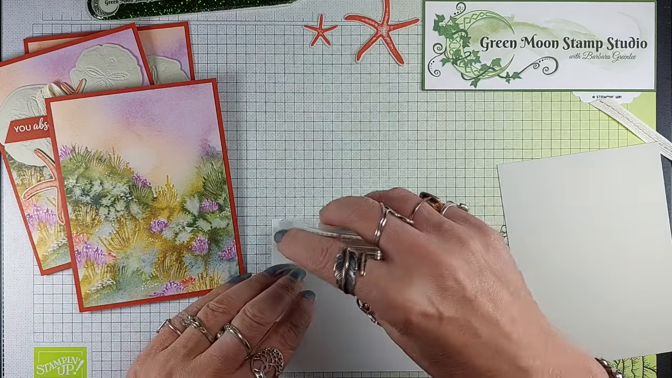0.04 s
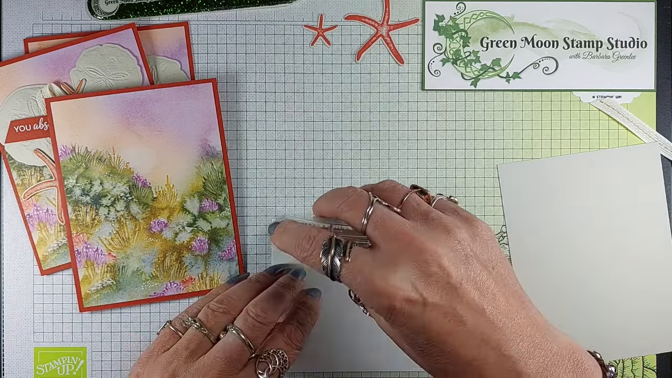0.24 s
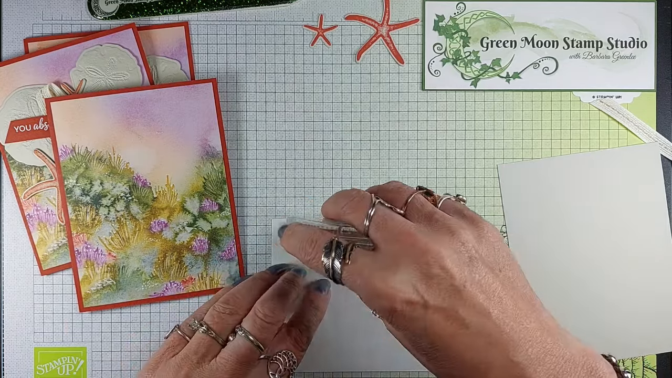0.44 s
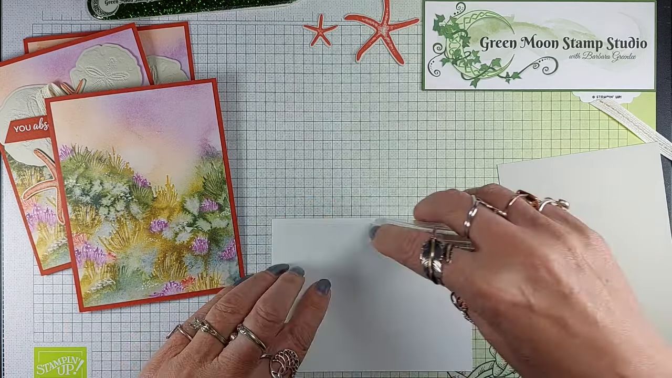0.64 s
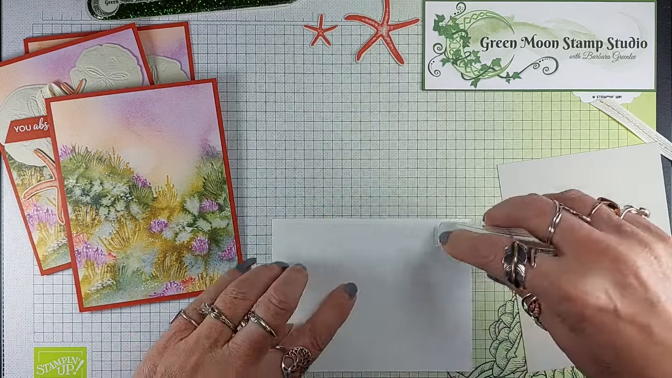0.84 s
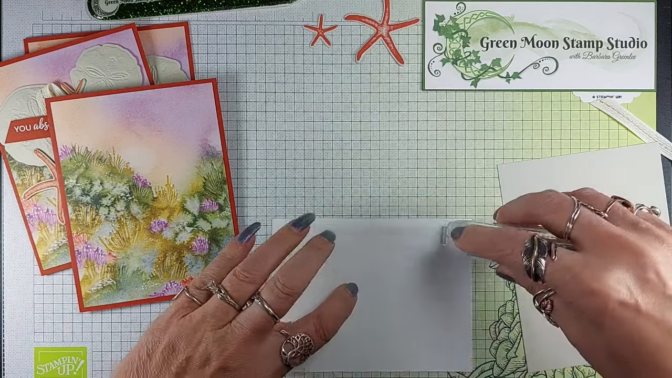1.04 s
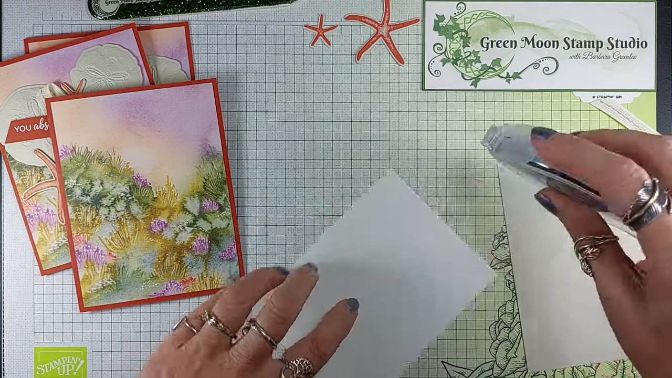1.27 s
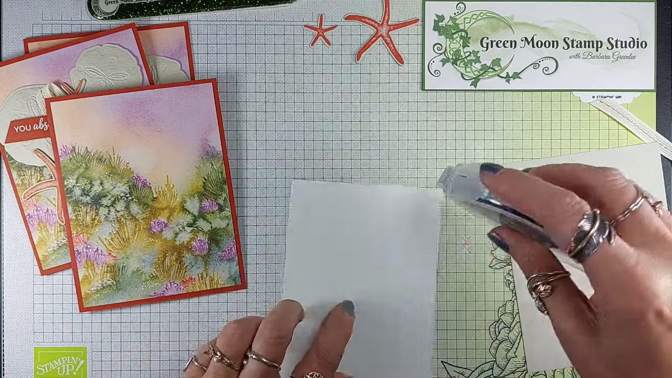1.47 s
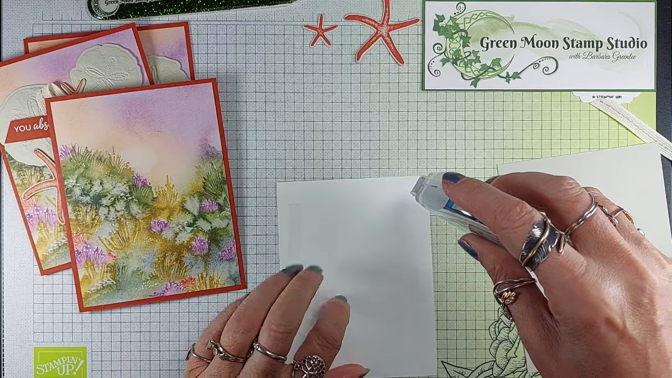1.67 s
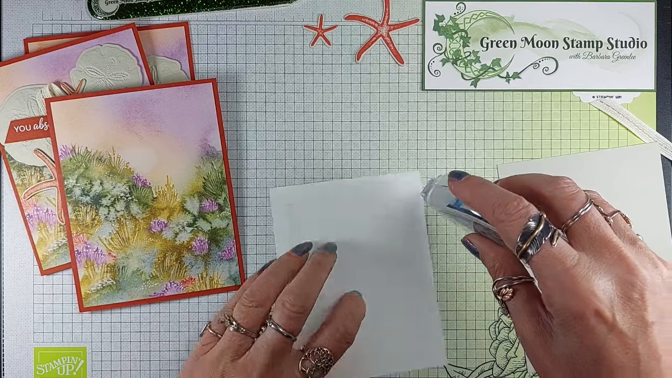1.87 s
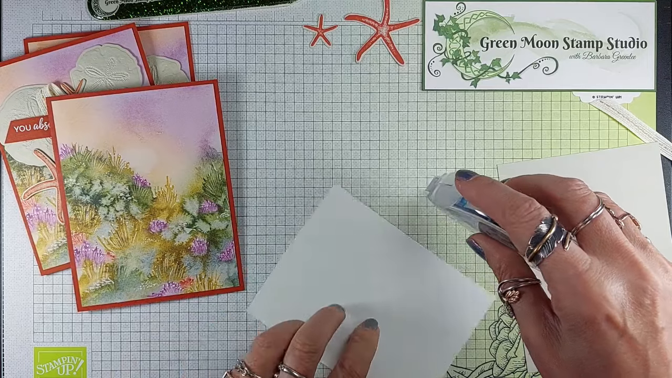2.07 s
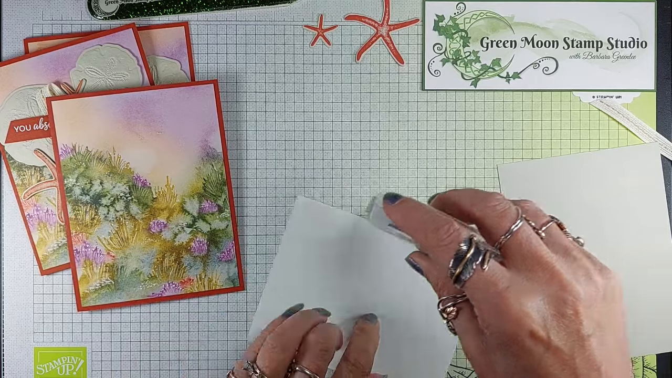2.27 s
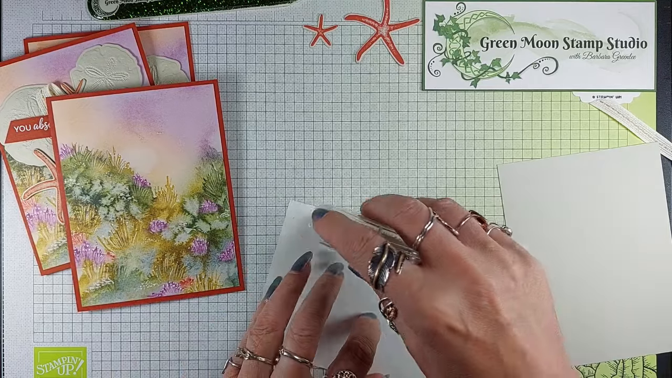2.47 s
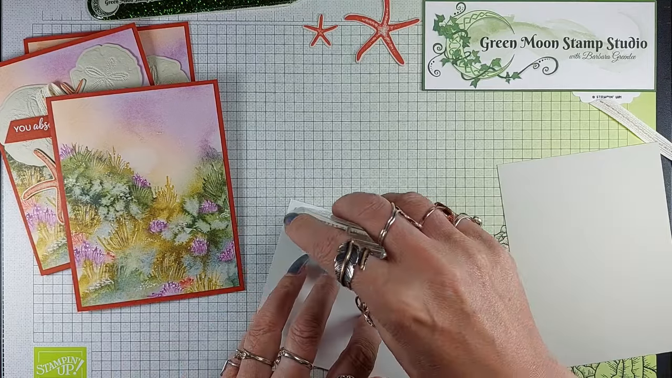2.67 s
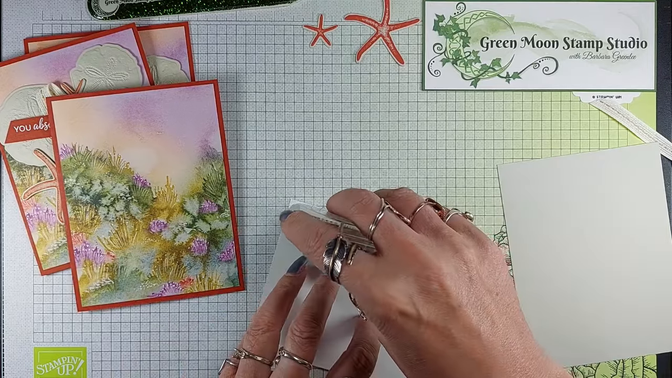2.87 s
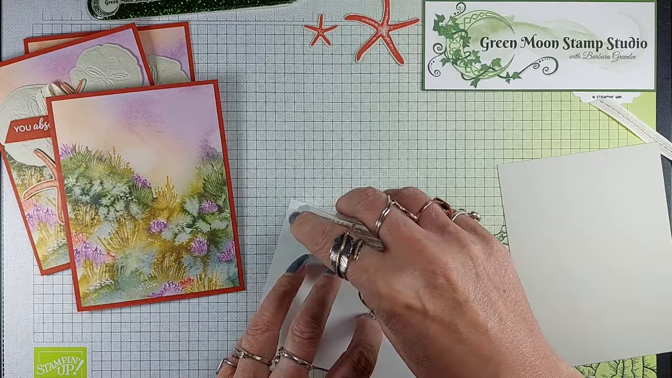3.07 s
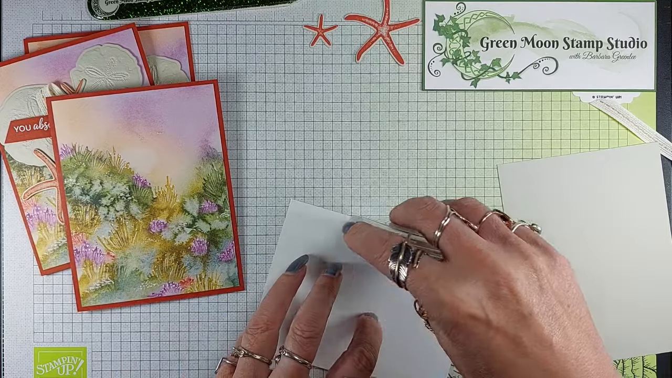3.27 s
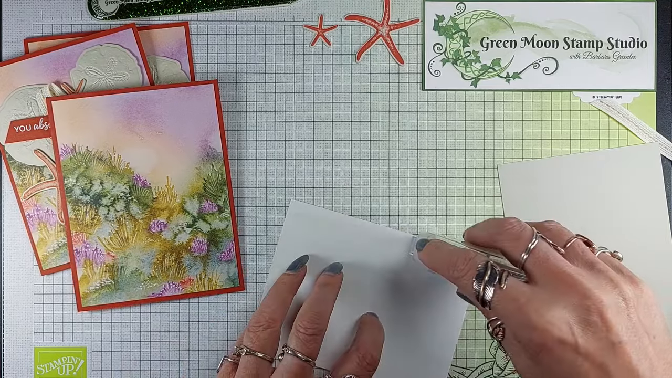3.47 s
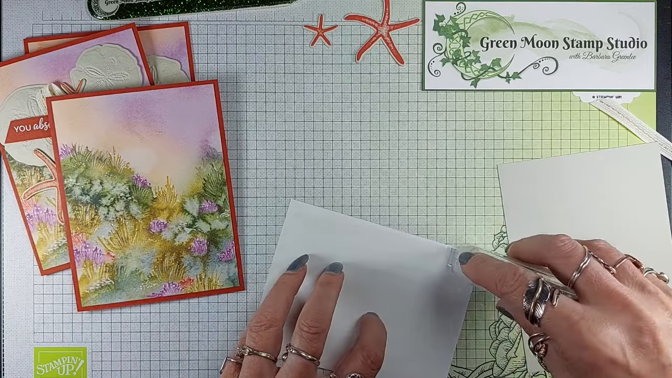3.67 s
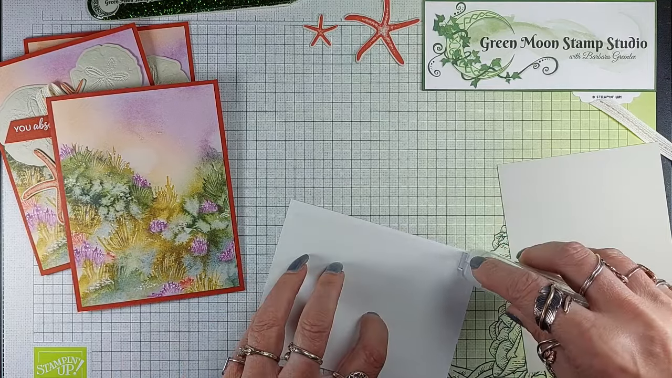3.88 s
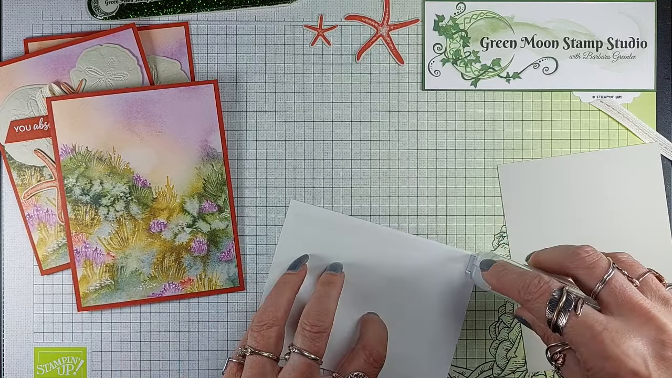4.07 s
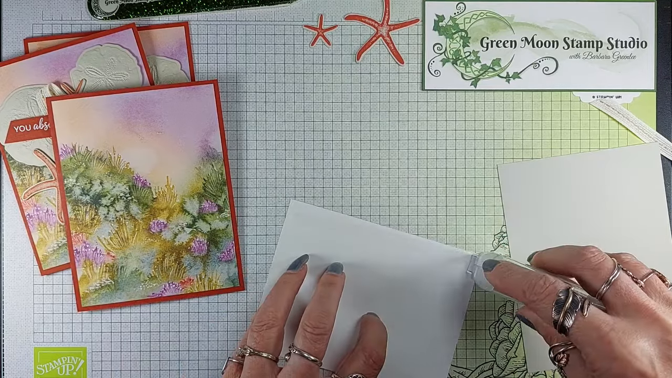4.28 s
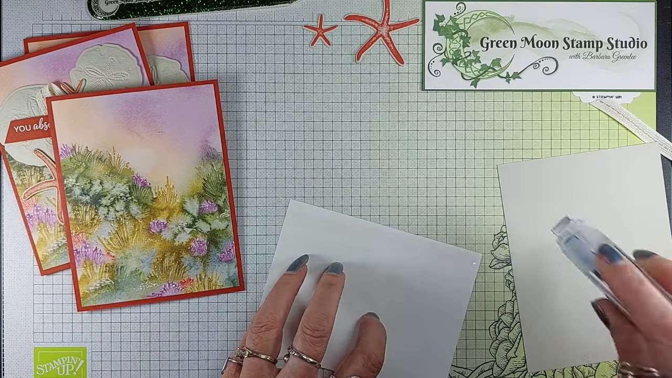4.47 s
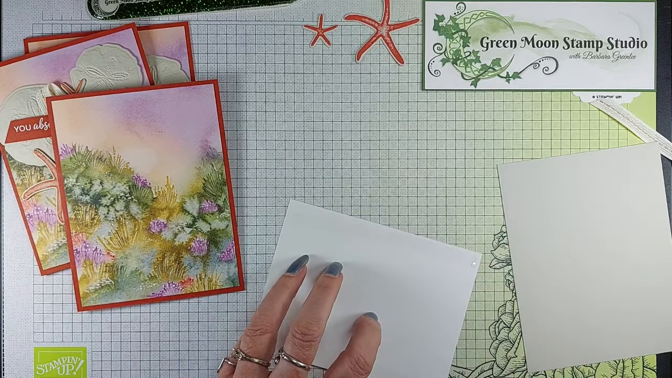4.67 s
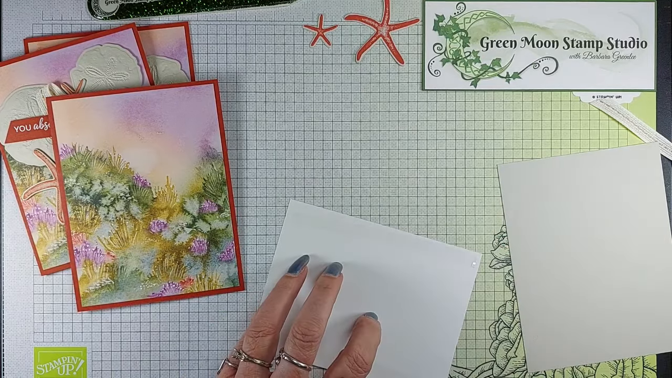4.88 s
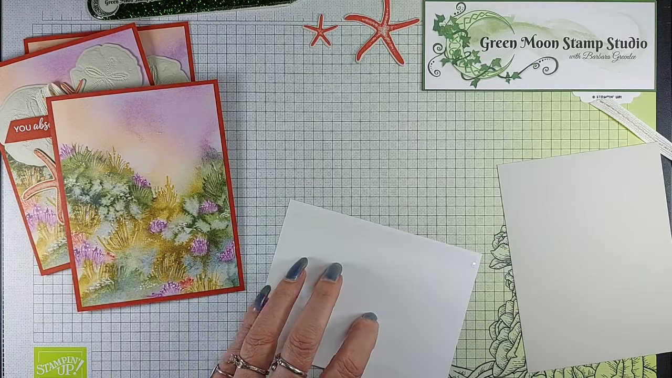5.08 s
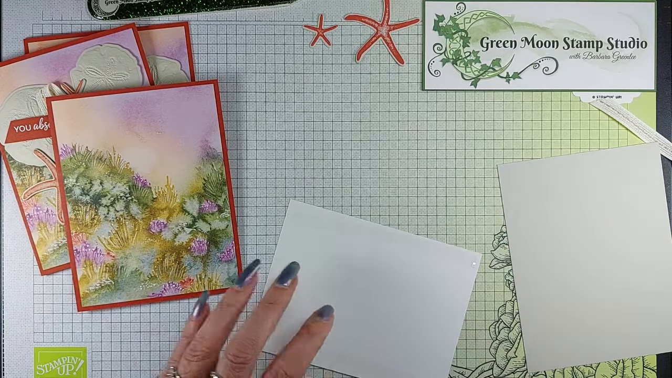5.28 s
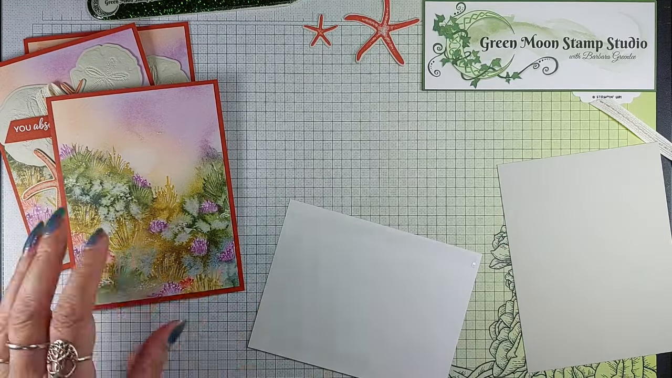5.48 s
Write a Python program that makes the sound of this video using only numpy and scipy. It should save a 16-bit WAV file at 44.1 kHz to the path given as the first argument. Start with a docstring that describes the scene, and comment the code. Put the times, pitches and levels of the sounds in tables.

```python
"""A craft table close under the microphone, in a quiet room with a low hum and a steady hiss throughout.
After a light tap a plastic tape runner creaks as it is pressed down, then is pulled across cardstock:
its ratchet buzzes, the tape hisses and the shell judders, all noise and clicks through filters and modes.
The card is slid and turned with hisses, rasps and taps, and a second creak and a second pull follow.
After more taps and a last slide the runner is put down, bounces, and soft pushes thump the table."""
import sys
import numpy as np
from scipy import signal
from scipy.io import wavfile
from scipy.ndimage import uniform_filter1d

SR = 44100
rng = np.random.default_rng(int(sys.argv[2]) if len(sys.argv) > 2 else 0)


def master_out(mix):
    """Clip the mix to full scale and print it as 16-bit PCM to the path in sys.argv[1]."""
    frames = np.transpose(np.atleast_2d(mix))
    ceiling = np.clip(frames, -1, 1)
    pcm = np.round(ceiling * 32767).astype(np.int16)
    wavfile.write(sys.argv[1], SR, pcm)


N = 243740
T = np.arange(N) / SR

# Modes of the runner's plastic shell: [centre_hz, width_hz, relative_db]
SHELL = [(500, 120, -2.5), (634, 70, 3), (783, 155, 13), (1032, 264, 14), (1263, 120, 11), (1544, 200, 2),
         (2100, 300, 2)]
# Modes of the mat and card under the hands: [centre_hz, width_hz, relative_db]
CARD = [(317.5, 46.7, -4.5), (462, 660, -12), (602.3, 45.6, 5), (860, 46, -2)]
# Spectrum of tape peeling off: [frequency_hz, relative_db]
PEEL = [(880, -24.5), (1500, -6.5), (2510, -7), (2810, 5.5), (3430, -10), (3840, 2), (4950, -6),
        (5800, -25), (7540, -39.5), (12800, -120)]
# Spectrum of a knock, the low part of a click, and of a scrape: [frequency_hz, relative_db]
KNOCK = [(600, -25.5), (1100, 5.5), (1800, 3.5), (2100, 4.5), (2450, 3), (3500, -36.5)]
# Spectrum of a blunt contact: [frequency_hz, relative_db]
SOFT = [(1000, 0), (4000, -40)]


def gain_of(db):
    """Decibels to gain."""
    return 10 ** (np.asarray(db) / 20)


def read(points, hz):
    """A spectrum table read on a log-frequency axis."""
    f, value = np.transpose(points)
    return np.interp(np.log(hz + 1), np.log(f + 1), value)


def colour(x, points):
    """Causal minimum-phase filter of a spectrum table, keeping the power of white noise."""
    hz = abs(np.fft.fftfreq(8192, 1 / SR))
    log_gain = np.log(gain_of(np.maximum(read(points, hz), -100)))
    spectrum = np.exp(np.conj(signal.hilbert(log_gain)))
    response = np.fft.ifft(spectrum).real[:4096]
    return signal.oaconvolve(x, response / np.linalg.norm(response))[:len(x)]


def ring(x, modes):
    """A small body of damped modes, which radiates no bass; the power of white noise is kept."""
    t = T[:2048]
    response = np.zeros(len(t))
    for hz, width, db in modes:
        decay = np.exp(-np.pi * width * t)
        response += gain_of(db) * np.sqrt(width) * decay * np.sin(2 * np.pi * hz * t)
    no_bass = signal.butter(5, .85 * modes[0][0], "high", fs=SR, output="sos")
    response = signal.sosfilt(no_bass, response)
    return signal.oaconvolve(x, response / np.linalg.norm(response))[:len(x)]


def levels(tables, count):
    """Smoothed gain curves of the dB columns, silent between the tables."""
    out = np.zeros((count, N))
    for rows in tables:
        s, *columns = np.transpose(rows)
        out += [gain_of(np.interp(T, s, c, -200, -200)) for c in columns]
    return uniform_filter1d(out, size=128, axis=1)


def bursts(train, decay_s, between):
    """Noise that swells up at each click and dies away; its power stays near one while the clicks run."""
    fade = np.exp(-2 / (decay_s * SR))
    power = signal.lfilter([1], [1, -fade], uniform_filter1d(train ** 2, size=50))
    near = uniform_filter1d(power, size=1300) + 1e-9
    gain = np.sqrt(abs(power) / near + between) / np.sqrt(1 + between)
    return gain * rng.standard_normal(N)


def flicker(depth_db, span_s):
    """A random gain that wanders within the given time, with a mean power of one."""
    steps = rng.standard_normal(int(N / SR / .001) + 2)  # one each millisecond
    slow = signal.lfilter([1], [1, -np.exp(-.001 / span_s)], steps)
    wander = np.interp(T, np.arange(len(slow)) / 1000, slow / slow.std())
    gain = gain_of(depth_db * wander)
    return gain / np.sqrt(np.mean(gain ** 2))


def slips(counts, spread_db):
    """One click of random size at each whole count, a little early or late."""
    train = np.zeros(N)
    for rows in counts:
        s, count = np.transpose(rows)
        at = np.interp(np.arange(count[0], count[-1] + 1), count, s)
        uneven = rng.uniform(-0.12909, 0.0993, len(at))  # share of the spacing
        at = at + uneven * np.gradient(at)
        train[(at * SR).astype(int)] = gain_of(spread_db * rng.standard_normal(len(at)))
    return train


def touches(rows, fades_s):
    """Drives of short contacts, one line for each part: a rough noise burst [0] and a clean impulse [1]."""
    t = T[:1500]
    drive = np.zeros((2, len(fades_s), N))
    fades = np.exp(-t / np.array(fades_s)[:, None])
    for s, *dbs in rows:
        at = round(s * SR)
        touch = fades * np.minimum(t / 0.00074, 1) * rng.standard_normal(len(t))
        touch /= np.linalg.norm(touch, axis=1)[:, None]
        drive[0, :, at:at + len(t)] += gain_of(dbs)[:, None] * touch
        drive[1, :, at] += gain_of(dbs)
    return drive


def air():
    """Room rumble and mains hum with a steady hiss above them."""
    # Spectrum of the quiet room: [frequency_hz, relative_db]
    air_spectrum = [(12, -59.5), (20, -34.5), (43, -10.5), (65, 1.5), (81, -7.5), (110, -3), (193, -19),
                    (430, -31.5), (897, -36), (1290, -42), (2530, -44.5), (16000, -50.5)]
    hum_hz, hum_db, air_db = 59.4, -67.5, -65
    hum = gain_of(hum_db) * np.sin(2 * np.pi * (hum_hz * T + rng.random()))
    noise = colour(rng.standard_normal(N + SR), air_spectrum)[SR:]  # drop the filter's start
    return hum + gain_of(air_db) * noise


def taps():
    """A short contact rings the card and spits a knock, a tick and a sizzle; the knock lasts longest."""
    # Taps of nails, rings and card edge: [start_s, thud_db, click_db, brightness_db]
    contacts = [(0.123, -58.5, -50.5, -3), (0.423, -47.5, -28, 9), (0.434, -53.5, -36, 1),
                (1.07, -53, -50, -15), (1.127, -49.5, -34, -1.5), (1.142, -63, -28, -0.5),
                (1.155, -40, -35.5, -4), (1.42, -46, -45, 5), (1.486, -46.5, -53, 4), (1.822, -34, -41, 12),
                (1.827, -28.5, -25.5, 3), (2.502, -43, -41, 2), (2.611, -87, -41.5, 0),
                (2.804, -61.5, -53.5, -3), (2.983, -75, -51, -4), (3.024, -80, -50.5, -1),
                (4.304, -63.5, -49.5, 4), (4.342, -55, -33, -7), (4.356, -54, -41.5, -12),
                (4.4, -50.5, -38.5, 0), (4.405, -42, -35.5, -3), (4.416, -46.5, -55.5, -18),
                (4.501, -50, -44, -8)]
    # Spectra of the middle and the high part of a click: [frequency_hz, relative_db]
    tick = [(1800, -22), (3200, 0.5), (4100, -1), (6500, -13), (7600, -39.5)]
    sizzle = [(6500, -19.5), (8500, -3), (16000, -13.5)]
    knock_db, sizzle_db = -4, -6  # relative to the tick; brightness tips the balance
    rows = [(s, thud, click + knock_db - bright, click, click + sizzle_db + bright)
            for s, thud, click, bright in contacts]
    # the echo hears the modes from all sides, less sharply
    blurred = [(hz, 4.1 * width, db) for hz, width, db in CARD]
    drives = touches(rows, [.0015, 0.0063, 0.0022, 0.0022])
    thud_drive = colour(drives[1, 0], SOFT)  # the clean impulse serves close and far
    close_and_far = []
    for (_, low, middle, high), card in zip(drives, [CARD, blurred]):
        click = colour(low, KNOCK) + colour(middle, tick) + colour(high, sizzle)
        close_and_far.append(ring(thud_drive, card) + click)
    return close_and_far


def creak():
    """The shell, pressed down, creaks in even little slips of plastic on plastic, each with a faint rasp."""
    # One table a press: [time_s, slips_so_far]
    presses = [
        [(.289, 0), (.4058, 17)],
        [(3.068, 0), (3.086, 4)],
    ]
    # Spectrum of a slip: [frequency_hz, relative_db]
    slip_spectrum = [(290, -39.5), (500, -14), (796, -15), (1080, -12.5), (1550, -6), (2050, -39.5),
                     (2820, -10), (3530, -11.5), (3980, 1), (5330, -15), (5850, -30), (12000, -26),
                     (15600, -70.5)]
    train = slips(presses, 1.5)
    running = uniform_filter1d(train, size=600) > 1e-6
    rasp = gain_of(-30) * running * bursts(train, 0.0022, 0.6)
    return colour(gain_of(-44.5) * (train + rasp), slip_spectrum)


def runner():
    """Each tooth clicks and tugs the hissing tape; the roller's stick and slip shake the shell."""
    # Tape drawn out in each stroke, counted in ratchet teeth: [time_s, teeth_so_far]
    teeth_drawn = [
        [(.424, 2), (.7043, 30), (.7836, 41), (.8357, 45), (.8858, 47), (.9043, 48)],
        [(3.1172, 0), (3.1308, 1), (3.1527, 3), (3.1792, 6), (3.2473, 14), (3.4357, 41), (3.5431, 53),
         (3.69, 62)],
    ]
    # One table a stroke, the pull felt as shell rumble: [time_s, rumble_db, ratchet_db]
    strokes = [
        [(0.44, -66.5, -67), (0.48, -51.5, -69), (0.53, -49, -77), (0.6, -44.5, -61), (0.72, -42, -65.5),
         (0.8, -51, -67), (0.95, -77.5, -79)],
        [(3.115, -65, -62.5), (3.17, -48.5, -50.5), (3.23, -52.5, -63.5), (3.27, -45.5, -51),
         (3.37, -42.5, -53), (3.44, -50.5, -72), (3.6, -61.5, -84), (3.68, -69.5, -88), (3.77, -105, -101)],
    ]
    # The loudest teeth: [start_s, level_db]
    loud_teeth = [(.731, -34.5), (.737, -28), (3.141, -24), (3.152, -23.5), (3.269, -21)]
    # Spectrum of the ratchet: [frequency_hz, relative_db]
    ratchet_spectrum = [(1470, -18.5), (2500, -16.5), (2900, -9), (4410, 0), (5310, -11), (6350, 0.5),
                        (8330, -8.5), (10800, -2.5), (16000, -21)]
    # The table top drones under the pull: [centre_hz, width_hz, relative_db]
    drone_modes = [(299.6, 13.3, 0)]
    # Drone against the rumble, one value a stroke: [level_db]
    drone_db = [-24.5, -14.5]
    # The pressing hand shakes the whole table: [centre_hz, width_hz, relative_db]
    press_modes = [(109, 69, 0)]
    # Hiss between the teeth, one value a stroke, the first drags more: [power_ratio]
    smears = [0.19, 0.058]
    peel_db, peel_share, press_db = -6.5, 0.25, -22  # press against the rumble

    rumble, ratchet = levels(strokes, count=2)
    clicks = slips(teeth_drawn, 2.59)
    first = T < strokes[0][-1][0]

    shell = ring(rumble * flicker(3.54, 0.0045) * rng.standard_normal(N), SHELL)
    drone_gain = gain_of(np.where(first, *drone_db))
    drone = ring(drone_gain * rumble * rng.standard_normal(N), drone_modes)
    press = ring(gain_of(press_db) * rumble * rng.standard_normal(N), press_modes)

    # the tape's hiss lies between pull and ratchet
    peel = gain_of(peel_db) * ratchet ** peel_share * rumble ** (1 - peel_share)
    tape = colour(peel * flicker(6.9, 0.0095) * bursts(clicks, 0.0019, 0.882), PEEL)

    snaps = touches(loud_teeth, [.0012])[0, 0]
    buzz = ratchet * bursts(clicks, 0.0016, np.where(first, *smears))
    teeth = colour(buzz + snaps, ratchet_spectrum)
    return shell + drone + press + tape + teeth


def judders():
    """A short rough jolt favours the shell modes near its own pitch, with a little crack of peel noise."""
    # Judders of the shell during the pulls, and two faint knocks after the second:
    # [start_s, peak_db, pitch_hz]
    jolts = [(0.464, -38, 1230), (0.479, -36, 980), (0.494, -37, 1130), (0.522, -38, 960),
             (0.538, -36, 970), (0.552, -33, 910), (0.563, -33.5, 910), (0.577, -28.5, 920),
             (0.588, -25, 1130), (0.597, -26, 1220), (0.606, -32.5, 970), (0.62, -31.5, 1000),
             (0.644, -33, 900), (0.652, -30.5, 1130), (0.663, -36.5, 1110), (0.68, -29.5, 800),
             (0.698, -29.5, 805), (0.705, -26, 1140), (0.711, -35, 1000), (0.72, -33, 913),
             (0.733, -30, 905), (0.766, -31.5, 793), (0.809, -32.5, 817), (0.845, -42.5, 990),
             (3.192, -34, 1260), (3.25, -31.5, 1220), (3.281, -36, 1000), (3.33, -28, 1110),
             (3.345, -28, 870), (3.359, -31, 900), (3.392, -27.5, 1290), (3.403, -33.5, 800),
             (3.419, -40, 900), (3.46, -32.5, 945), (3.573, -41, 650), (3.596, -43, 820),
             (3.633, -38.5, 784), (3.8, -61, 914), (3.86, -59.5, 936)]
    crack_db = -17.5  # under each jolt, ahead of the peel filter
    out, cracks = np.zeros((2, N))
    t = T[:700]
    for s, db, hz in jolts:
        noise = rng.standard_normal(len(t))
        swing = np.sin(2 * np.pi * hz * t + 3 * noise[0])  # random phase
        jolt = (t * hz) ** 2 * np.exp(-t * hz / 0.68) * (swing + 2.2 * noise)
        sound = ring(jolt, SHELL)
        at = round(s * SR)
        out[at:at + len(t)] += gain_of(db) * sound / abs(sound).max()
        cracks[at:at + len(t)] += gain_of(db + crack_db) * np.exp(-t / 0.0029) * noise
    return out + colour(cracks, PEEL)


def slides():
    """Paper fibres under card and fingers hiss, fizz and scrape on the table top, which hums along."""
    # Slides, the hum as it drives card and shell:
    # [start_s, loudest_s, end_s, hiss_db, fizz_over_hiss_db, hum_over_hiss_db, scrape_over_hiss_db]
    movements = [(1.07, 1.316, 1.411, -60, -1.5, -0.5, -41), (1.383, 1.5, 1.55, -72, 1, -28, -23),
                 (1.86, 1.88, 2.21, -66, 4.5, -16, -16), (1.926, 2.024, 2.028, -55, -1.5, -10.5, -36),
                 (2.003, 2.072, 2.17, -65, -6, -9, -27), (4.338, 4.373, 4.47, -69.5, -6, 5, 3.5)]
    # Spectra of the fibres' hiss and fizz: [frequency_hz, relative_db]
    hiss_spectrum = [(1060, -42), (1800, -93), (2030, -25), (2780, -7.5), (3980, -0.5), (7500, -12),
                     (9750, -77), (16500, -120)]
    fizz_spectrum = [(6800, -13.5), (8300, 15.5), (10000, 17), (13000, 11), (16000, -5)]
    rise_db, fall_db = -19, -23  # level at the start and at the end, under the loudest
    power = np.zeros((4, N))
    for start, top, end, db, *over_db in movements:
        u = np.interp(T, [start, top, end], [-1, 0, 1])
        slope_db = np.where(u < 0, rise_db, fall_db) * abs(u) ** 1.7
        swell = gain_of(db + slope_db) * (abs(u) < 1)
        power += (gain_of([0, *over_db])[:, None] * swell) ** 2
    hiss, fizz, hum, scrape = np.sqrt(power)
    fibres = flicker(1.6, 0.0011) * rng.standard_normal(N)
    paper = colour(hiss * fibres, hiss_spectrum) + colour(fizz * fibres, fizz_spectrum)
    hum_drive = hum * flicker(4.6, 0.061) * rng.standard_normal(N)
    humming = 0.6 * ring(hum_drive, CARD) + 0.65 * ring(hum_drive, SHELL[2:])
    scraping = colour(scrape * flicker(7.9, 0.0014) * rng.standard_normal(N), KNOCK)
    return paper + humming + scraping


def rasps():
    """Flickering noise in one narrow resonance, swelling and fading."""
    # Thin, faint rasps during and between the movements:
    # [start_s, end_s, centre_hz, width_hz, level_db]
    thin_rasps = [(1.084, 1.157, 3770, 260, -68), (2.07, 2.324, 3880, 900, -82.5),
                  (3.5, 4.074, 4280, 400, -91.5), (4.41, 4.721, 2095, 299, -85),
                  (4.76, 4.84, 2485, 201, -83)]
    out = np.zeros(N)
    for start, end, hz, width, db in thin_rasps:
        along = np.clip((T - start) / (end - start), 0, 1)
        swell = np.sin(np.pi * along ** 0.67) ** 0.36
        band = signal.butter(2, [hz - width / 2, hz + width / 2], "band", fs=SR, output="sos")
        rasp = signal.sosfilt(band, flicker(5.3, 0.0065) * rng.standard_normal(N))
        out += gain_of(db) * swell * rasp / rasp.std()
    return out


def landings():
    """The table thuds and the casing clacks with the modes that the landing end excites; the echo blurs them."""
    # The runner is put down and bounces; the end that lands runs from 0 nose to 1 heel:
    # [start_s, thud_db, clack_db, landing_end]
    bounces = [(5.062, -22.5, -17.5, 0.013), (5.073, -20, -37, 0.58), (5.213, -21.5, -21, 0.97),
               (5.225, -29.5, -30, 0.8), (5.394, -45, -40, 0.9)]
    # Modes of its casing: [centre_hz, width_hz, nose_relative_db, heel_relative_db]
    casing = [(1440, 110, 3, 0), (1810, 140, -12, 12.5), (2430, 300, 7.5, 7.5), (3140, 240, -1, 10.5),
              (4020, 230, -8, -23.5), (5260, 220, -8, -35)]
    # Modes of the bare table further off: [centre_hz, width_hz, relative_db]
    table_modes = [(319.6, 22, 7), (482, 230, 10), (570, 130, 3), (807, 120, -7.5)]
    # Spectrum of the casing's contact, which lacks the highest treble: [frequency_hz, relative_db]
    hard = [(5000, -3), (7200, -15), (9000, -12)]
    rows = [(s, thud, clack - 99 * end, clack - 99 * (1 - end)) for s, thud, clack, end in bounces]
    close_and_far = []
    for (low, on_nose, on_heel), blur in zip(touches(rows, [.004, .0015, .0015]), [1, 1.7]):
        nose = [(hz, blur * width, db) for hz, width, db, _ in casing]
        heel = [(hz, blur * width, db) for hz, width, _, db in casing]
        thud = ring(colour(low, SOFT), table_modes)
        clack = colour(ring(on_nose, nose) + ring(on_heel, heel), hard)
        close_and_far.append(thud + clack)
    return close_and_far


def thumps():
    """A soft push: one swing with a smaller one on either side."""
    # Soft pushes on the table, timed at the main swing: [peak_s, peak_db, pitch_hz]
    pushes = [(5.07, -35, 96), (5.222, -33.5, 124), (5.4, -34.5, 112)]
    out = np.zeros(N)
    for s, db, hz in pushes:
        u = (T - s) * hz
        out -= gain_of(db) * np.exp(-(u / 0.4) ** 2) * np.cos(2 * np.pi * u)
    return out


def room(x):
    """Sparse reflections of random sign, each band dying at its own speed."""
    # Decay time by 60 dB: [frequency_hz, t60_s]
    decay_times = [(300, 0.4), (3000, 0.35), (7000, 0.35), (14000, 0.54)]
    tail = np.zeros(SR)
    at = np.arange(300, SR - 20, 20)
    tail[at + rng.integers(0, 20, len(at))] = rng.choice([-1., 1.], len(at))
    hz, t, bands = signal.stft(tail, SR, nperseg=256)
    t60 = np.maximum(read(decay_times, hz), .05)[:, None]
    tail = signal.istft(bands * gain_of(-60 * t / t60), SR, nperseg=256)[1]
    return signal.fftconvolve(x, tail / np.linalg.norm(tail))[:N]


def scene():
    """The hands' work, its echo and the room; the runner lands further off, so the room answers it louder."""
    work = creak() + runner() + judders() + slides() + rasps()
    tap_close, tap_far = taps()
    land_close, land_far = landings()
    echo = room(gain_of(-13.5) * work + gain_of(-8.0) * tap_far + gain_of(-3.5) * land_far)
    return (air() + tap_close + work + land_close + thumps() + echo)[None]


def record(dry):
    """The recorder's band limit, a steep low-pass."""
    edge_hz = 15900
    low_pass = signal.firwin(511, edge_hz, window=("kaiser", 9), fs=SR)
    return signal.oaconvolve(dry, low_pass[None], "same")


dry = scene()
out = record(dry)
master_out(out)
```